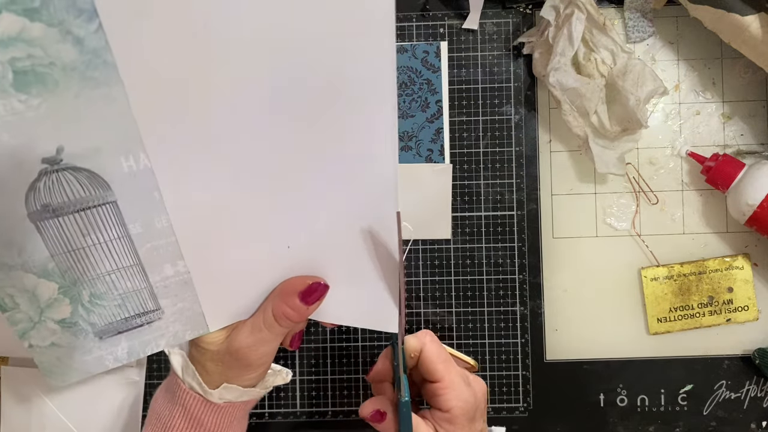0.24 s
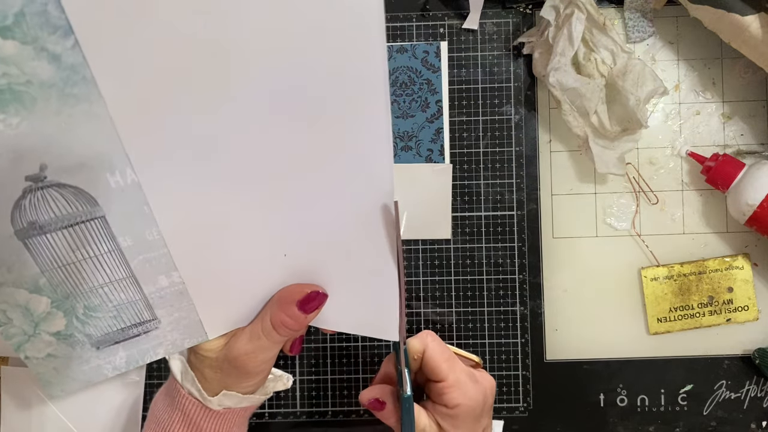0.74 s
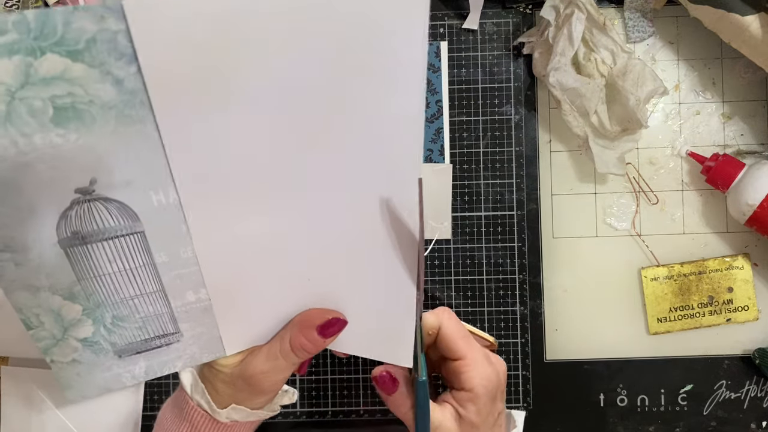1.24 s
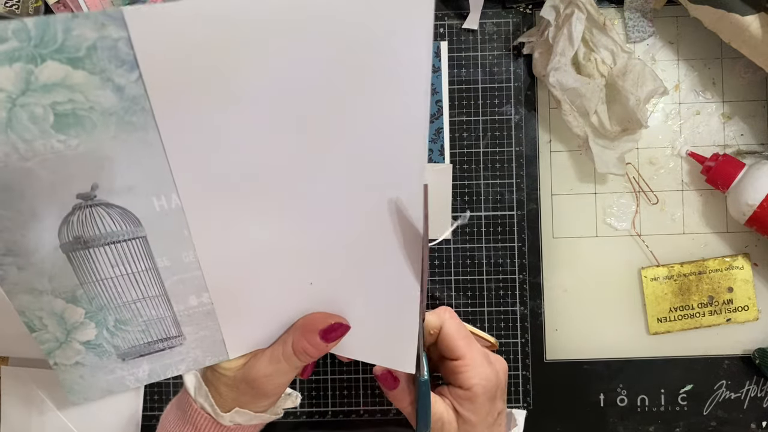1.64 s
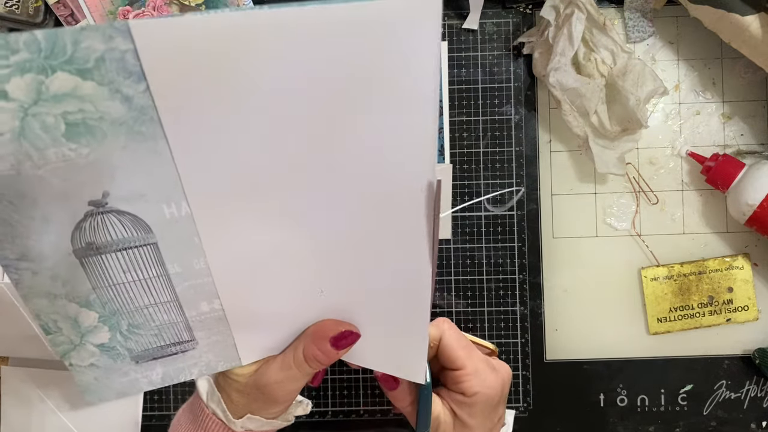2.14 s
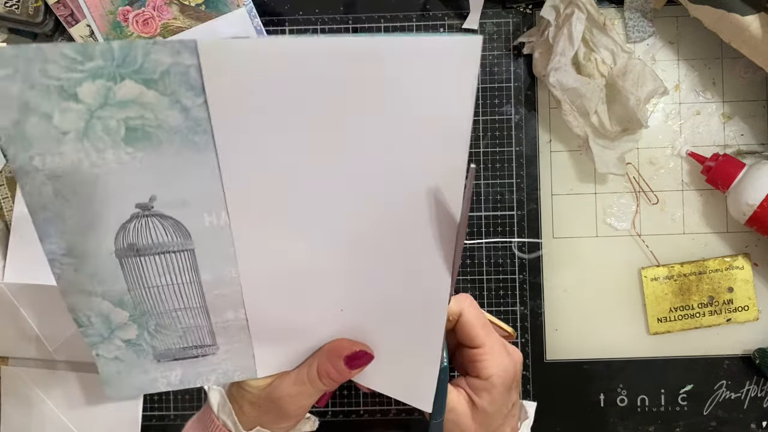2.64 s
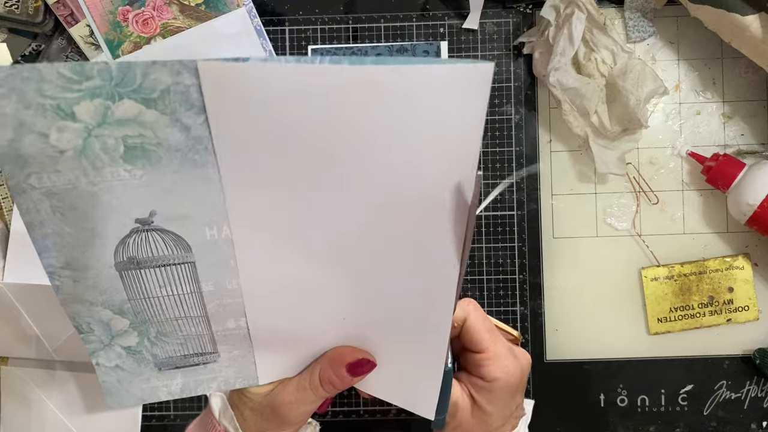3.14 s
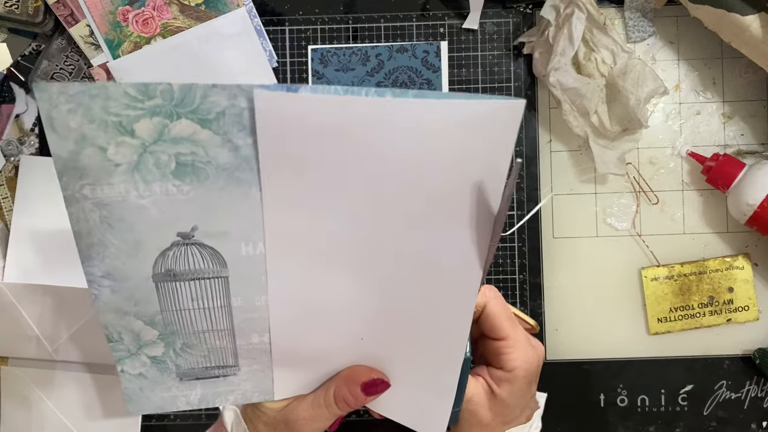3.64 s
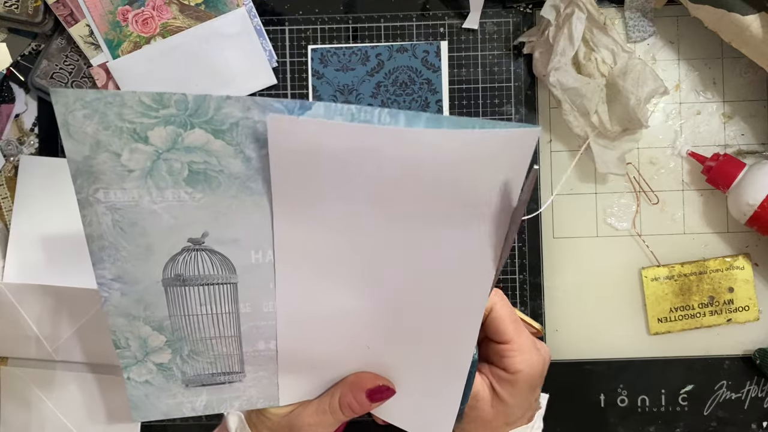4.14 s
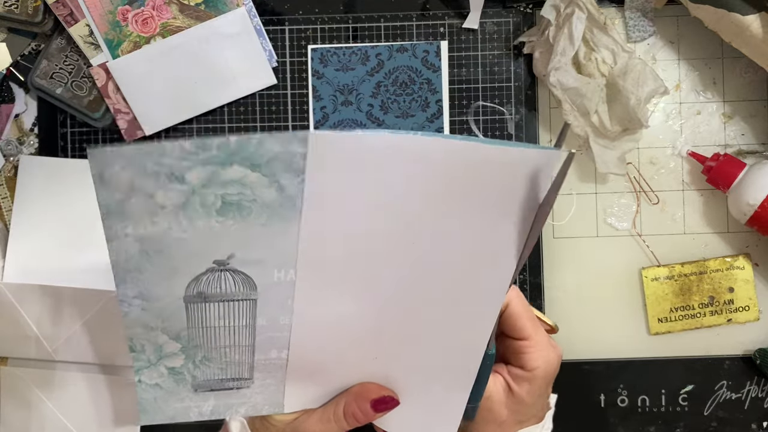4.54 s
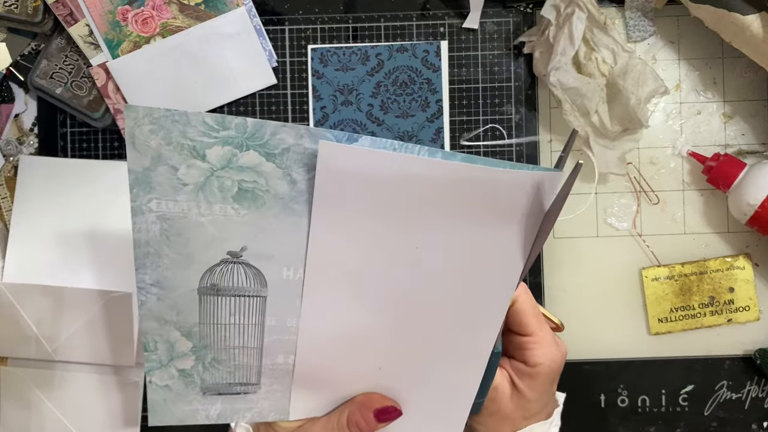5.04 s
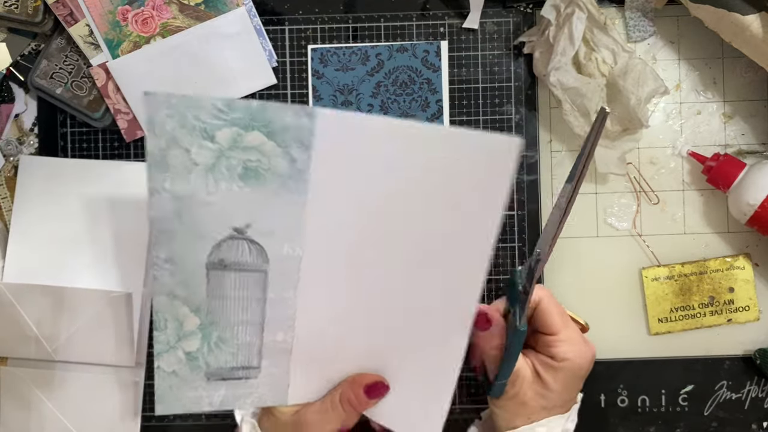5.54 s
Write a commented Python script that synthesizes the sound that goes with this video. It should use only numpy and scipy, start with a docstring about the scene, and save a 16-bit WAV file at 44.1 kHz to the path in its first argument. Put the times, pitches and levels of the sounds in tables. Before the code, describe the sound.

Close, crunchy scissor cuts through stiff paper alternate with brief scrapes of the sheet sliding along the blades.

```python
"""Crisp, jerky snips: scissors trim a thin strip off stiff paper, close under a two-port microphone.
While the blades close, the paper gives way in short bites; while they open, the sheet rasps along the steel.
Sheet and blades ring briefly, and now and then the sheet buckles with a low knock.
Below lie the low rumble, hum and faint hiss of a quiet room."""
import sys
import numpy as np
from scipy import signal
from scipy.fft import rfft, irfft
from scipy.io import wavfile

SR = 44100
rng = np.random.default_rng(int(sys.argv[2]) if len(sys.argv) > 2 else 0)


def dump(signal):
    """Clip the signal to [-1, 1] and save it as 16-bit WAV at the path in sys.argv[1]."""
    limited = np.clip(np.atleast_2d(signal).T, -1, 1)
    pcm = np.round(limited * 32767).astype(np.int16)
    wavfile.write(sys.argv[1], SR, pcm)


N = 255780

# flexing modes of the whole sheet: f/Hz, width/Hz, level/dB
SHEET_MODES = [(279, 143, -1), (462, 106.5, 0)]
# closing strokes, in (start, end) pairs: t/s, drag/dB, upper ring/dB re a bite, hiss/dB re a bite
CLOSING_STROKES = [(0.0, 0.914, -52.5, -76, -1.9, 6, -12.5, -9.5), (1.429, 2.094, -71, -63, 5.5, -7, 0, -9),
                   (2.848, 3.184, -68.5, -62.5, -1, -1.5, -0.5, -1.5),
                   (3.936, 4.258, -62.5, -61.5, -1, -1, -4, -0.4),
                   (4.91, 5.236, -62.5, -60, -4, 1.5, -4.5, 3),
                   (5.542, 5.634, -75, -80, -4.5, -1.5, -8.5, 9.5)]


def from_db(db):
    """Gain of a level in dB."""
    return 10 ** (np.asarray(db) / 20)


def rms_one(x):
    """Scaled to rms 1."""
    return x / np.sqrt(np.mean(x ** 2) + 1e-20)


def in_time(points):
    """A (t/s, value) curve at every sample."""
    return np.interp(np.arange(N) / SR, *np.transpose(points))


def at_hz(points):
    """A (f/Hz, value) curve at every bin of the whole-length spectrum."""
    hz, value = np.transpose(points)
    return np.interp(np.log(np.arange(N // 2 + 1) * SR / N + 1), np.log(hz + 1), value)


def coloured(x, spectrum):
    """A smooth EQ curve; white noise keeps its rms."""
    return irfft(rfft(x) * rms_one(from_db(at_hz(spectrum))), N)


def resonant(x, modes):
    """Parallel resonances, signs alternating; white noise keeps about its rms."""
    out, power = 0, 0
    for k, (hz, width_hz, level_db) in enumerate(modes):
        r = np.exp(-np.pi * width_hz / SR)
        b = (1 - r * r) / 2 * np.array([1, 0, -1])
        a = [1, -2 * r * np.cos(2 * np.pi * hz / SR), r * r]
        out = out + (-1) ** k * from_db(level_db) * signal.lfilter(b, a, x)
        power += from_db(2 * level_db) * np.pi * width_hz / SR
    return out / np.sqrt(power)


def wander(shape, step, spread_db):
    """Gains that glide between random values, step points apart along the last axis."""
    knots = rng.standard_normal((*shape[:-1], shape[-1] // step + 2))
    whole, part = np.divmod(np.arange(shape[-1]), step)
    glide = knots[..., whole] * (1 - part / step) + knots[..., whole + 1] * part / step
    return from_db(spread_db * glide)


def grains(shape, uneven_db, grain_s):
    """Gritty noise whose level jumps from one breaking fibre bundle to the next; rms 1."""
    steps = from_db(uneven_db * rng.standard_normal(shape))
    held = np.arange(shape[-1]) // round(grain_s * SR)
    return rms_one(steps[..., held] * rng.standard_normal(shape))


def ports(x):
    """The two microphone ports hear one sound, each with its own phase and level."""
    # lead of the left port: f/Hz, phase/rad
    lead = [(1, 0), (600, -.2), (1210, -.15), (2840, -.9), (4220, -.6), (5430, -.9), (6290, -.2),
            (7320, 1.5), (8350, 2.8), (9200, 3.15), (10200, 3.8), (11300, 6), (13500, 6.5), (14300, 8)]
    # left minus right: f/Hz, level/dB
    balance = [(60, 0), (200, -0.5), (620, -3), (1360, -1), (3000, -3.5), (5200, -6), (8600, 1),
               (14100, -0.5)]
    half = from_db(at_hz(balance) / 2) * np.exp(.5j * at_hz(lead))
    return irfft(rfft(x) * np.array([half, 1 / half]), N)


def ambience():
    """Room tone: a steady bed of rumble and hiss, an unsteady low hum and a deep rumble that swells."""
    # colour of the bed: f/Hz, relative level/dB
    bed_colour = [(25, -52.5), (40, -26), (65, -1), (120, -10.5), (180, -16.5), (300, -32.5), (500, -35),
                  (800, -35), (1100, -46), (1500, -48.5), (2800, -52.5), (4500, -54.5), (7500, -59),
                  (11000, -61.5), (14600, -67)]
    # noise that each port hears alone: f/Hz, level/dB re the shared noise
    own_colour = [(50, -13.5), (150, -10), (500, 6.5), (1500, 3.5), (5000, -8), (14000, -7)]
    # swell of the deep rumble: t/s, level/dB
    swell = [(0.0, -60), (0.31, -72), (2.91, -65), (3.99, -56), (4.78, -60), (4.99, -64.5), (5.8, -66)]
    hum_modes = [(84.6, 7.6, -1), (98.05, 3, -0.5)]   # f/Hz, width/Hz, level/dB
    shared, deep, hum, *own = rng.standard_normal((5, N))
    apart = irfft(rfft(own) * from_db(at_hz(own_colour)), N)
    bed = from_db(-59) * coloured(ports(shared) + apart, bed_colour)
    hum = from_db(-63.5) * rms_one(resonant(resonant(hum, hum_modes), hum_modes))
    deep = signal.sosfilt(signal.butter(2, [40, 56], "band", fs=SR, output="sos"), deep)
    return bed + hum + from_db(in_time(swell)) * rms_one(deep)


def room(x, t60_s=0.15, level_db=-14):
    """A short, slightly dull tail of scattered reflections, unlike in the two ports."""
    t = np.arange(round(.3 * SR)) / SR
    tail = rng.standard_normal((2, len(t))) * from_db(-60 * t / t60_s) * (t > .004)
    tail = signal.lfilter([1], [1, -.25], tail)
    tail /= np.sqrt(np.sum(tail[0] ** 2))
    return from_db(level_db) * signal.fftconvolve(x[None], tail, axes=1)[:, :N]


def paper_and_blades(force):
    """Four shares of a force shake four layers: lower ring, sheet, upper ring and fibre hiss."""
    # lower ring of blades and paper edge: f/Hz, width/Hz, level/dB
    lower_modes = [(784, 430, -7.5), (1109, 165, 2), (1317, 280, -2.5), (1736, 139, 1), (1925, 145, -0.5)]
    # upper ring: f/Hz, width/Hz, level/dB
    upper_modes = [(2182, 26, -1), (2566, 430, 5), (2750, 222, 6.5), (2930, 200, 3.5), (3375, 496, -4)]
    # hiss of the fibres: f/Hz, relative level/dB
    hiss_colour = [(3000, -9.5), (4500, 3.5), (6000, -1), (7500, 2), (9000, -2), (11000, -5), (13000, -13),
                   (14000, -16), (15500, -34)]
    lower, sheet, upper, fibres = force + 1e-18
    ring = resonant(lower, lower_modes) + resonant(upper, upper_modes)
    return ring + resonant(sheet, SHEET_MODES) + coloured(fibres, hiss_colour)


def dragging(fade_db_per_s=137):
    """A faint crackle: single fibres part as the sheet drags in each cut, fading once the blades stop."""
    # lower ring, sheet, upper ring, hiss: level/dB re the drag
    shares_db = [-8.5, -7, -6, -12.5]
    t = np.arange(N) / SR
    drag = 0
    for start, end, start_db, end_db, *_ in CLOSING_STROKES:
        level_db = in_time([(start, start_db), (end, end_db)]) - fade_db_per_s * np.maximum(t - end, 0)
        drag = drag + (t >= start) * from_db(level_db)
    crackle = grains((N,), uneven_db=5, grain_s=.001)
    return paper_and_blades(drag * from_db(np.c_[shares_db]) * crackle)


def sliding(min_width_hz=80):
    """The sheet rasps and sings along the steel; colour and tones shift as the contact moves. The last two
    slides are the sheet rustling as it is taken away."""
    # one envelope a slide: t/s, level/dB
    slides = [
        [(.96, -55.5), (.982, -43), (1.03, -49.5), (1.112, -45), (1.158, -49.5), (1.216, -47.5), (1.25, -91)],
        [(2.3, -68), (2.326, -46), (2.39, -45.5), (2.44, -51.5), (2.494, -49), (2.538, -49.5), (2.57, -85)],
        [(3.4, -83.5), (3.424, -52.5), (3.465, -49), (3.59, -52), (3.652, -46), (3.7, -51.5), (3.72, -91)],
        [(4.43, -97), (4.44, -55), (4.485, -52.5), (4.53, -53), (4.57, -68), (4.62, -53.5), (4.665, -55),
         (4.7, -80)],
        [(5.33, -52), (5.36, -60.5), (5.428, -68), (5.452, -60), (5.489, -79)],
        [(5.49, -66), (5.502, -64), (5.532, -66), (5.555, -64), (5.59, -82), (5.742, -80.5), (5.8, -73.5)],
    ]
    # mix of each slide, re its level: sheet/dB, upper ring/dB, hiss at start/dB, hiss at end/dB
    mixes = [(-7, 0.5, -2, -19.5), (-6.5, -2, -3, 0), (-5, 3, 1.2, -8.5), (-1, 4.5, 8, -1.2),
             (-2, .1, 3.5, -9.5), (3, 2.5, -1.5, 6.5)]
    # tones of each slide, in the first four set by the free length of blade: f/Hz, width/Hz, level/dB re the
    # slide
    blade_tones = [
        [(1110, 117, -2), (1880, 60, -25.5), (6900, 730, -12.5)],
        [(1074, 84, -5.5), (1620, 34, -20.5), (7760, 210, -16)],
        [(1586, 52, -15), (3180, 400, -9.5), (4920, 680, -17)],
        [(1347, 150, -26), (2840, 24, -13.5), (3700, 360, -11), (4540, 45, -17.5)],
        [(5960, 59, -18), (6640, 60, -15)],
        [(616, 240, -6), (1030, 74, -8.5)],
    ]
    t = np.arange(N) / SR
    friction = grains((N,), uneven_db=3, grain_s=.00084)
    gains, singing = 0, 0
    for slide, (sheet_db, upper_db, hiss_start_db, hiss_end_db), tones in zip(slides, mixes, blade_tones):
        start, end = slide[0][0], slide[-1][0]
        touching = (t > start) & (t < end)
        hiss_db = in_time([(start, hiss_start_db), (end, hiss_end_db)])
        shares_db = np.array(np.broadcast_arrays(0, sheet_db, upper_db, hiss_db))
        shares = touching * from_db(in_time(slide) + shares_db)
        gains = gains + shares
        pressure = np.sqrt(np.sum(shares ** 2, axis=0))
        for hz, width_hz, tone_db in tones:
            drive = wander((N,), step=1500, spread_db=4) * pressure * friction + 1e-18
            singing = singing + from_db(tone_db) * resonant(drive, [(hz, max(width_hz, min_width_hz), 0)])
    gains = gains * wander((4, N), step=1200, spread_db=2.2)
    return paper_and_blades(gains * friction) + singing


def bursts(events, crack_s=.0019):
    """Tearing noise swells and dies for each event: peak/s, nominal t60/ms, rise/ms, four layer gains."""
    t = np.arange(round(.12 * SR)) / SR
    decay_rates = np.c_[[1.05, .8, 1.05, 1.2]]   # the hiss dies first, the sheet last
    spectra = rfft(grains((len(events), len(t)), uneven_db=2, grain_s=.00079))
    tearing = irfft(spectra * wander(spectra.shape, step=50, spread_db=3), len(t))   # each its own colour
    force = np.zeros((4, N + len(t)))
    for (peak_s, t60_ms, rise_ms, shares), noise in zip(events, tearing):
        rise, t60 = rise_ms / 1000, t60_ms / 1000
        swell = np.minimum(t / rise, 1)
        fall_db = -60 * np.maximum(t - rise, 0) / t60
        envelope = swell * from_db(fall_db)
        crack = crack_s / rise * np.exp(-np.abs(t - rise) / .00004)   # the more sudden, the louder
        noise = noise + crack * np.sign(noise[0])
        energy = np.sum(envelope ** 2)   # tear and sheet thump are both scaled to this
        noise *= np.sqrt(energy / np.sum((envelope * noise) ** 2))
        thump = resonant(envelope * noise, SHEET_MODES)
        layers = noise * np.c_[[1, np.sqrt(energy / np.sum(thump ** 2)), 1, 1]]
        at = max(round((peak_s - rise) * SR), 0)
        force[:, at:at + len(t)] += np.c_[shares] * swell * from_db(fall_db * decay_rates) * layers
    return paper_and_blades(force[:, :N])


def knocks(ring_db=-6):
    """Burst events of the sheet buckling: a low knock that also stirs the lower ring."""
    # buckles: peak t/s, level/dB, nominal t60/ms, rise/ms
    buckles = [(0.212, -49.5, 30, 7), (0.354, -47.5, 8.9, 5), (0.966, -44, 10.5, .56),
               (1.126, -32, 15, 1.5), (1.998, -43, 20, 1.45), (2.276, -36.5, 18, 0.49),
               (3.064, -55.5, 13.4, 6.9), (4.057, -34, 7, 8.5), (4.245, -54.5, 7.4, 0.66),
               (5.326, -40, 39, 1.5)]
    shares = np.array([from_db(ring_db), 1, 0, 0])
    return [(peak_s, t60_ms, rise_ms, from_db(db) * shares) for peak_s, db, t60_ms, rise_ms in buckles]


def bites(usual_rise_ms=1.7, spread_db=1.5):
    """Burst events of the paper giving way between the closing blades, each with its own mix."""
    # tears: peak t/s, level/dB, nominal t60/ms, rise/ms
    tears = [(.005, -41.5, 8.9, 0.18), (.046, -32.5, 6.9, 1.5), (.084, -48, 180, 4.2),
             (.115, -41.5, 49, 6.6), (.136, -48, 93, 3.7), (.164, -42.5, 29, 3.7), (.213, -33, 24, 6.2),
             (.26, -38.5, 91, 4), (.273, -42.5, 16, 8.9), (.303, -40.5, 35, 6.1), (.334, -46, 13, 10.8),
             (.353, -38.5, 17, 6.2), (.427, -33, 59, 0.85), (.445, -35.5, 48, .35), (.488, -48, 13, 6.4),
             (.552, -32.5, 71, 1.62), (.579, -39, 20, 6), (.599, -38.5, 79, 8.5), (.624, -45, 15, 10.5),
             (.674, -32, 20, 1.54), (.711, -32, 36, 6.3), (.726, -32.5, 15, 6.5), (.732, -34, 7, 4.4),
             (.787, -26.5, 37, 0.57), (.838, -38, 17, 0.74), (.908, -62, 90, 1.7), (.944, -56, 29, 1),
             (.964, -49, 13, 0.8), (1.125, -39.5, 30, 2.06), (1.458, -48, 59, 5.1), (1.498, -53, 30, 11.2),
             (1.558, -45.5, 51, 2.2), (1.608, -43.5, 12, 14.5), (1.624, -44.5, 28, 7.4),
             (1.662, -44, 30, 9.8), (1.678, -49, 33, 2.4), (1.694, -48, 17, 6.3), (1.758, -39.5, 64, 6.5),
             (1.786, -42.5, 49, 5.8), (1.84, -39, 23, 7), (1.871, -40, 26, 4.5), (1.919, -37.5, 62, 0.94),
             (1.942, -42, 31, 3.3), (1.963, -40, 41, 0.37), (1.979, -37.5, 66, 3.04),
             (2.028, -33.5, 71, 1.5), (2.05, -41, 41, 1.9), (2.075, -34, 14, 2.05), (2.086, -41.5, 48, 4.7),
             (2.276, -33, 33, 0.6), (2.778, -74, 12, 1.9), (2.855, -48.5, 89, 0.77), (2.902, -50, 42, 8.1),
             (2.922, -58, 29, 4), (2.956, -48.5, 21, 10.3), (3.006, -43, 79, 7.5), (3.011, -44, 24, 7.2),
             (3.051, -33.5, 22.5, 1.5), (3.064, -40, 20, 7.7), (3.074, -42.5, 14, 5.7),
             (3.1, -44, 115, 1.9), (3.118, -51.5, 24, 4.4), (3.147, -45.5, 32, 1.4), (3.164, -40, 53, 1.44),
             (3.189, -49.5, 110, 3.1), (3.207, -43.5, 29, 12.2), (3.23, -46.5, 71, 1.97),
             (3.243, -56, 20, 2.2), (3.371, -63.5, 91, 0.77), (3.795, -66, 12, 1.16), (3.953, -45, 73, 5.4),
             (3.983, -48, 32, 7), (4.001, -50, 38, 5.2), (4.024, -46.5, 39, 4.4), (4.048, -41.5, 107, 6.1),
             (4.057, -39.5, 3.6, 10.2), (4.104, -41.5, 32, 11), (4.127, -40.5, 28, 0.94),
             (4.143, -47.5, 37, 8.3), (4.178, -39, 41, 6.3), (4.216, -39, 61, 3.9), (4.246, -50.5, 20, 2.2),
             (4.277, -43.5, 13, 3), (4.925, -54.5, 13, 7), (4.951, -56, 35, 7.2), (4.985, -38.5, 51, 2.04),
             (5.016, -51, 68, 9.1), (5.045, -44.5, 24, 3.8), (5.088, -40, 42, 7.8), (5.121, -46, 74, 6.1),
             (5.153, -47, 59, 3.3), (5.18, -45, 49, 0.56), (5.214, -44.5, 28, 11.8),
             (5.233, -49.5, 23, 3.9), (5.281, -44, 13, 5), (5.325, -35.5, 32, 1.6), (5.366, -49.5, 43, 9.5),
             (5.542, -40.5, 53, 3.6), (5.549, -44.5, 4.6, 8.3), (5.623, -67, 26, 0.95),
             (5.673, -69, 34, 1.15)]
    strokes = np.array(CLOSING_STROKES)
    stroke_s = strokes[:, :2].ravel()
    events = []
    for peak_s, level_db, t60_ms, rise_ms in tears:
        upper_db = np.interp(peak_s, stroke_s, strokes[:, 4:6].ravel())
        hiss_db = np.interp(peak_s, stroke_s, strokes[:, 6:8].ravel())
        hiss_db += np.log2(usual_rise_ms / rise_ms)   # 1 dB more for each halving of the rise
        thump_db = -6.5 + .36 * hiss_db   # the sheet partly follows the hiss
        shares_db = rng.normal([0, thump_db, upper_db, hiss_db], spread_db)
        events.append((peak_s, t60_ms, rise_ms, from_db(level_db + shares_db)))
    return events


def scene():
    """Scissors and paper, heard directly and through the room, over the room tone."""
    scissors = bursts(bites() + knocks()) + sliding() + dragging()
    return ports(scissors) + room(scissors) + ambience()


def record(dry, stop_hz=16200):
    """A steep low-pass takes off the very top."""
    return signal.sosfilt(signal.cheby2(10, 60, stop_hz, fs=SR, output="sos"), dry)


dry = scene()
out = record(dry)
dump(out)
```